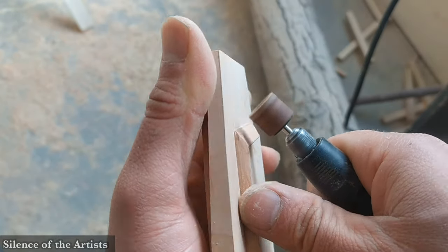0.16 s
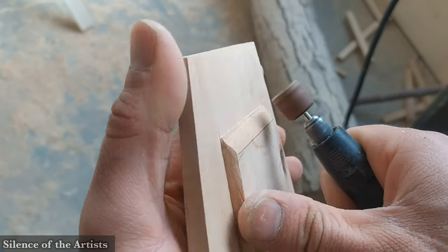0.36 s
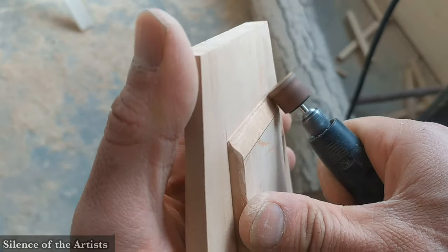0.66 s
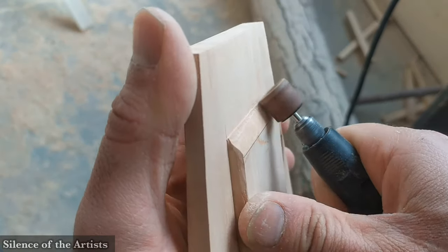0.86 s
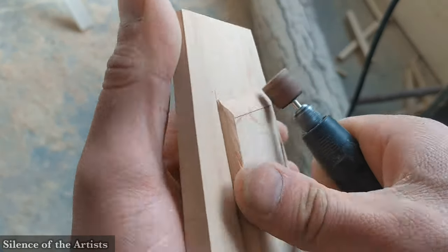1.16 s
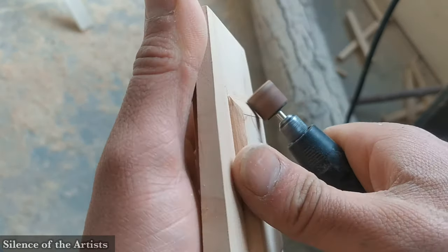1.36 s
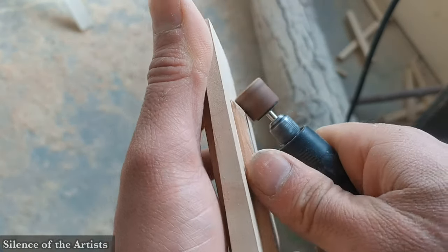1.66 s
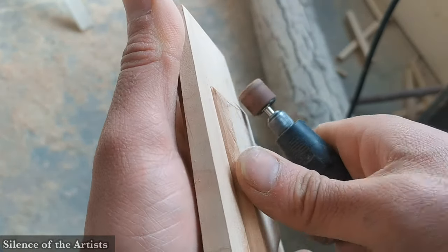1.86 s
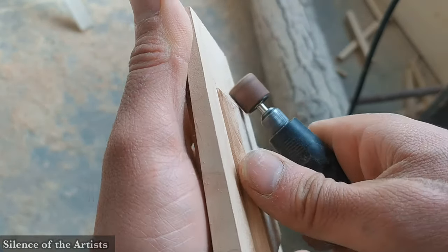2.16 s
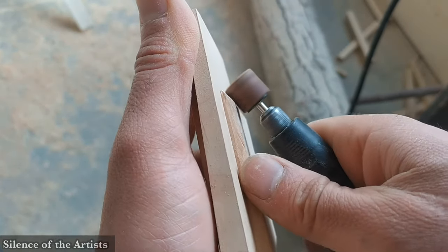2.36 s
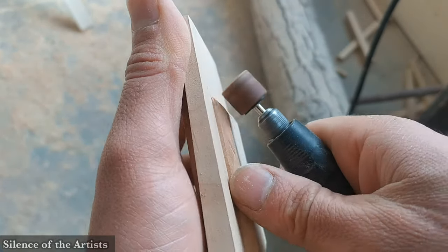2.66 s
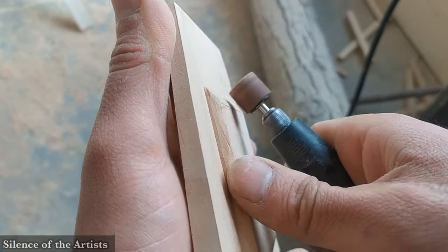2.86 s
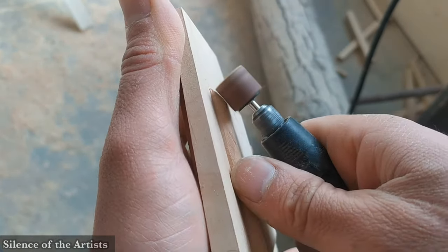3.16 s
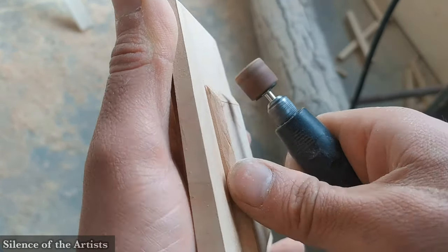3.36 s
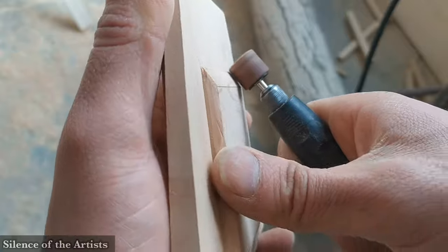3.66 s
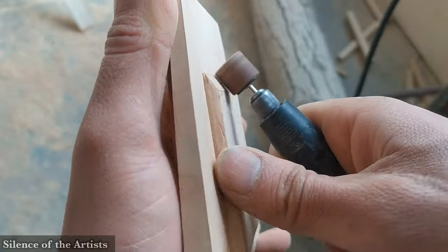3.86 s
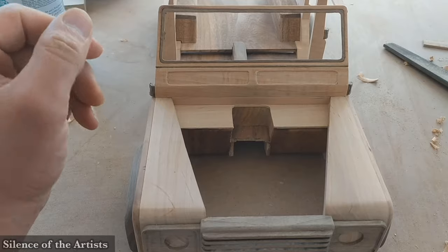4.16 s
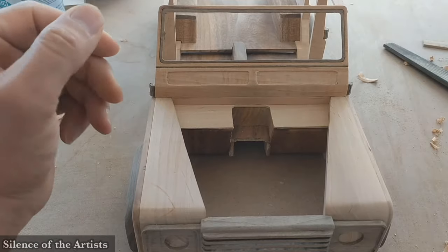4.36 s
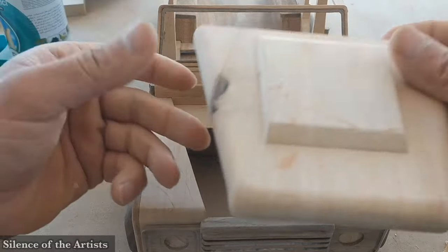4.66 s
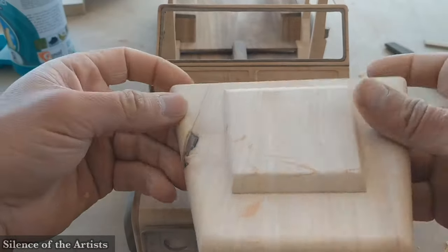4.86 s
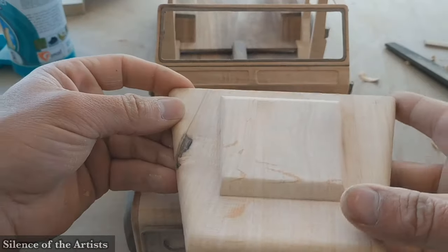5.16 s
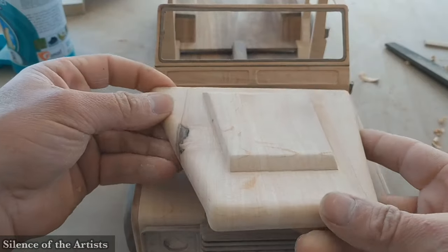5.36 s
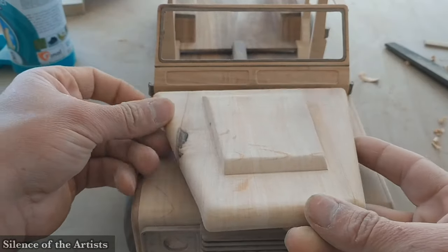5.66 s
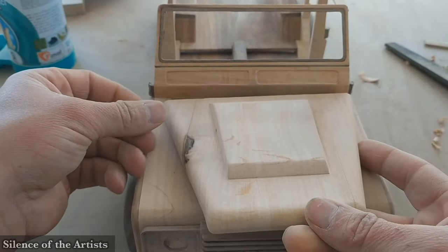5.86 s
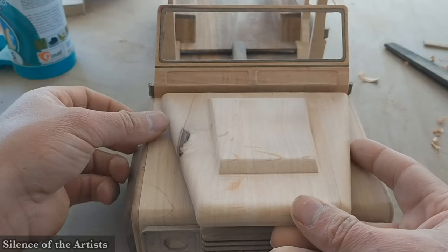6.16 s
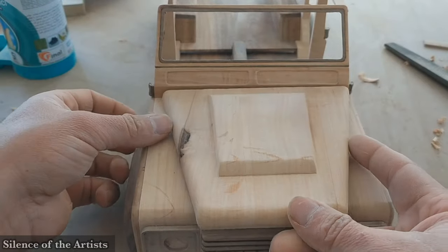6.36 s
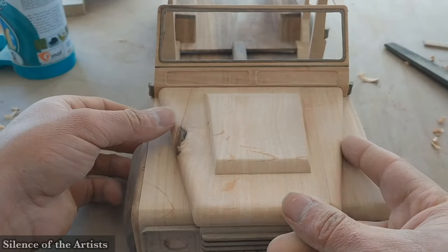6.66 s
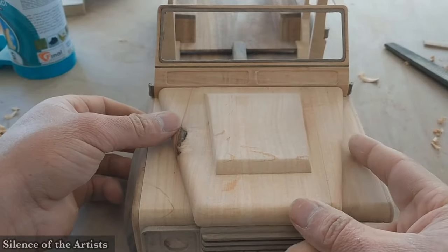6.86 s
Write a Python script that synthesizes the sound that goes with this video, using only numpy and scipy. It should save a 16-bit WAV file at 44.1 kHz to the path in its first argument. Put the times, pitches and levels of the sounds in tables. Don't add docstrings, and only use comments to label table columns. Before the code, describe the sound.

A small high-speed sander buzzes against wood for four seconds, stops dead, then hands rustle softly and set a wooden lid onto a hollow model.

```python
import sys
import numpy as np
from scipy import signal
from scipy.fft import rfft, irfft, next_fast_len
from scipy.io import wavfile
from scipy.ndimage import uniform_filter1d, map_coordinates

SR = 44100
rng = np.random.default_rng(int(sys.argv[2]) if len(sys.argv) > 2 else 0)


def field_ratio(decibels):
    return 10 ** (np.asarray(decibels, dtype=float) / 20)


def master_out(mix):
    frames = np.transpose(np.atleast_2d(mix))
    ceiling = np.clip(frames, -1, 1)
    pcm = np.round(ceiling * 32767).astype(np.int16)
    wavfile.write(sys.argv[1], SR, pcm)


N = 308700
CUT_S = 4.04
CHATTER_IDLE_DB = -49.5
LOADED_DB, CLEAR_DB = -43, -37

# f/Hz, likeness/1
AIR_ALIKE = [(60, -0.28), (150, 0.38), (380, 0.46), (950, -0.22), (2380, -0.21), (5980, -0.046),
             (15000, -0.15)]


def tool():
    # t/s, contact rate f/Hz, hiss level/dB, brush level/dB, grip level/dB
    motor = [(0.0, 1010, -33, -46, -8), (0.12, 1076, -28, -38, 0.5), (0.4, 1141, -33.5, -38, -4.5),
             (0.71, 1184, -30, -40.5, -4), (0.86, 1154, -25, -37, 10.5), (1.03, 1095, -31, -33, -15.5),
             (1.35, 1164, -29, -43.5, 4.5), (1.715, 1093, -29.5, -42, -7.5), (1.9, 1150, -29.5, -40.5, -6),
             (2.08, 1107, -28.5, -42.5, 0.5), (2.28, 1080, -26.5, -33, 2.5), (2.5, 1033, -29.5, -63, -2),
             (2.66, 1058, -30.5, -47.5, 0), (3.0, 1084, -30, -43.5, 0), (3.21, 1073, -30, -43.5, -0.5),
             (3.37, 1119, -29.5, -34, -2.5), (3.64, 1133, -29.5, -37, 2.5), (3.84, 1095, -29, -44, -1.5)]
    # f/Hz, likeness/1
    tool_alike = [(60, 0.07), (130, 0.24), (290, 0.58), (640, 0.93), (1410, 0.94), (3100, -0.3),
                  (6820, 0.59), (15000, 0.49)]
    # f/Hz, level/dB
    tool_pan = [(60, -13), (130, 8), (290, 7.5), (640, 0.5), (1410, -2.5), (3100, 1.5), (6820, 0),
                (15000, -3)]
    # order/1 (multiple of the contact rate), level/dB
    stray = [(.45, -73), (.5, -75), (.77, -66), (.967, -54), (1.05, -62), (2.55, -60), (4.55, -60),
             (7.11, -51), (7.67, -48), (8.7, -51)]
    inertia_s = 0.05
    shade_hz, shade_width_hz, shade_loaded, shade_free = 3800, 340, 0.35, 0.97

    hz, hiss_db, brush_db, grip_db = curves(motor)
    hz = uniform_filter1d(hz, size=round(inertia_s * SR), mode="nearest")
    bearing_db, labour_db, bite_db, chatter_db = handling()
    free = np.clip((bearing_db - LOADED_DB) / (CLEAR_DB - LOADED_DB), 0, 1)

    cycles = np.cumsum(hz * (1 + 0.000581 * wobble(30))) / SR
    flutter = 1 + 0.036 * np.cos(np.pi / 10 * cycles + 2 * wobble(2.4))
    scatter = field_ratio(0.7 * rng.standard_normal(int(cycles[-1]) + 2))
    size = scatter[np.round(cycles).astype(int)]
    slip = 1 + np.clip(-np.gradient(hz) * SR / 150, 0, 4)

    hum, second = housing(hz, cycles, grip_db, flutter)
    clean = brushes(cycles, brush_db, flutter * size, slip) + hum
    clean = clean + bearing(cycles, bearing_db, labour_db, size, slip)
    clean = clean + drum(cycles, bite_db, hiss_db) + chatter(cycles, chatter_db)
    clean = clean + orders(cycles, stray, unsteady_db=5, blur=0.024)
    reflected = np.roll(clean, 37)

    noisy = lambda: grit(cycles, hiss_db, free, size) + housing_noise(chatter_db)
    pair = spread(clean + noisy(), reflected + noisy(), tool_alike)
    pair = pair + np.outer([1.2, -0.3], second)
    pair = filtered(pair, lambda f: field_ratio(np.outer([0.5, -0.5], along(tool_pan, f))))

    shaded = filtered(pair, lambda f: 1 / (1 + ((f - shade_hz) / shade_width_hz) ** 4))
    shading = np.maximum(free, np.clip((labour_db + 54.5) / 12, 0, 1))
    pair = pair - (shade_loaded + (shade_free - shade_loaded) * shading) * shaded
    return pair * np.clip((CUT_S - np.arange(N) / SR) / 0.00033, 0, 1)


def handling():
    # start t/s, length t/s, level/dB
    free_runs = [
        (0.03, 0.32, -35),
        (0.33, 0.45, -28),
        (1.07, 0.34, -38),
        (1.74, 0.22, -38.5),
        (2.68, 0.28, -43),
        (3.21, 0.22, -40.5),
        (3.44, 0.23, -37.5),
    ]
    # start t/s, length t/s, level/dB
    labours = [
        (.88, 0.11, -45.5),
        (1.42, .2, -55),
        (2.12, 0.092, -53.5),
        (2.25, .22, -43),
        (3.03, 0.12, -54),
    ]
    # start t/s, length t/s, level/dB
    bites = [
        (0.05, 0.66, -32),
        (0.72, 0.035, -28.5),
        (0.8, 0.13, -28.5),
        (1.11, 0.017, -33.5),
        (1.4, 0.03, -32),
        (2.08, 0.027, -20.5),
        (2.14, .03, -26.5),
        (3.72, 0.22, -30.5),
    ]
    # start t/s, length t/s, level/dB
    skips = [
        (0.6, 0.077, -42),
        (1.0, 0.015, -49),
        (1.47, 0.13, -43),
        (2.0, 0.061, -41.5),
        (2.4, 0.073, -42),
        (3.07, 0.072, -36.5),
        (3.73, 0.264, -42.5),
    ]
    sing_db_per_s, choke_db_per_s = 150, 248.5
    dig_db_per_s, lift_db_per_s = 300.5, 151.5
    return (strokes(free_runs, sing_db_per_s, choke_db_per_s, LOADED_DB),
            strokes(labours, sing_db_per_s, choke_db_per_s, -74),
            strokes(bites, dig_db_per_s, lift_db_per_s, -45),
            strokes(skips, dig_db_per_s, lift_db_per_s, CHATTER_IDLE_DB))


def brushes(cycles, brush_db, strength, slip):
    brush = [-20, -15.5, -20.5, -16, -8, -5.5, -16, -5.5, -34.5, -30.5, -24]
    buzz = orders(cycles, enumerate(brush, 3), unsteady_db=3.5, blur=0.022 * slip)
    return field_ratio(brush_db + 2.5) * strength * buzz


def bearing(cycles, bearing_db, labour_db, size, slip):
    rolling = [-35.5, -45.5, -2, -10.5, -2.5, 0.5, -7.5, -21, -34, -16.5]
    sung = [4, 5, 7.04]
    singing = [-19, -29, -6.5]
    labour = [-2, -7, 0]
    under = zip(np.arange(4, 14) - 0.095, rolling)
    cage = 1 + 0.17 * np.cos(2 * np.pi * 0.095 * cycles + wobble(15))
    whine = orders(cycles, under, unsteady_db=-1.5, blur=0.082 * slip)
    song = orders(cycles, zip(sung, singing), unsteady_db=-1.5, blur=0.03 * slip)
    growl = orders(cycles, enumerate(labour, 3), unsteady_db=7.0, blur=0.03)
    return field_ratio(bearing_db - 3.0) * size * cage * whine + field_ratio(bearing_db) * song + field_ratio(labour_db) * growl


def housing(hz, cycles, grip_db, flutter):
    # f/Hz, level/dB
    housing_hum = [(1005, -67), (1035, -39), (1068, -34), (1091, -30.5), (1115, -37.5), (1140, -49.5),
                   (1172, -35), (1190, -33.5)]
    # f/Hz, level/dB
    housing_second = [(2010, -66.5), (2090, -51), (2140, -53.5), (2185, -52.5), (2240, -53), (2300, -43),
                      (2345, -47.5), (2375, -63)]
    # start t/s, length t/s, gain level/dB
    loosens = [
        (.77, 0.11, -2.5),
        (.935, 0.013, 9),
        (.995, 0.059, 11),
        (1.47, 0.0091, 13.5),
        (1.625, 0.08, 8.5),
        (2.2, 0.097, 2),
        (2.99, 0.12, 3.5),
    ]
    hum_db = along(housing_hum, hz) + grip_db + strokes(loosens, 400, 700, 0)
    second_db = along(housing_second, 2 * hz)
    beads = field_ratio(np.clip((-hum_db - 35) / 2, 0.5, 5) * wobble(80))
    hum = field_ratio(hum_db - 2) * beads * flutter * np.sin(2 * np.pi * cycles)
    second = field_ratio(second_db + 5.0 + 4.0 * wobble(30.6)) * np.sin(4 * np.pi * cycles)
    return hum, second


def drum(cycles, bite_db, hiss_db):
    # f/Hz, width f/Hz, level/dB
    bite = [(2500, 1800, -18.5), (4350, 2800, -12.5), (6550, 480, 0.5), (7550, 780, -0.5)]
    press = np.clip(bite_db - hiss_db - 3.5, -30, 0)
    turns = pulses(cycles / 2, jitter=0.026, scatter_db=3.0, pattern=[1])
    strikes = unit(filtered(turns, resonances(bite)))
    return field_ratio(bite_db - 5.0 + 0.86 * press) * strikes


def chatter(cycles, chatter_db):
    half_orders = [-6, -3.5, -5, -1, -5, -10, -4.5]
    halves = zip(np.arange(5, 12) / 2, half_orders)
    level_db = chatter_db + np.clip(chatter_db + 55, -12, 1) - 2.0
    return field_ratio(level_db) * orders(cycles, halves, unsteady_db=1.0, blur=0.39)


def grit(cycles, hiss_db, free, size):
    # f/Hz, level/dB
    hiss = [(1470, -41), (2500, -19), (3250, -16.5), (3620, -28), (3730, -7), (4190, -12), (4490, -11),
            (5930, -12.5), (8720, -1.5), (10400, 1), (12200, -4), (15100, -8), (15800, -13.5)]
    repeat_loaded, repeat_free = 0.19, 0.95
    share = np.clip(repeat_loaded + (repeat_free - repeat_loaded) * free, 0, 1)
    noise = np.sqrt(share) * repeating(cycles) + np.sqrt(1 - share) * unit(patches(depth_db=0.5))
    gate = size * (1 + 0.058 * np.cos(2 * np.pi * cycles))
    level_db = hiss_db + 1.5 * free - 1.28 + 0.9 * wobble(24.83)
    return field_ratio(level_db) * coloured(gate * noise, hiss)


def housing_noise(chatter_db):
    # f/Hz, level/dB
    body = [(180, -60), (300, -32.5), (522, -13.5), (630, -18), (797, -5), (997, -4), (1080, 1),
            (1290, -13), (1540, -4), (3120, -7.5), (3770, 0.5), (4290, -8.5), (5000, -16), (6500, -25.5),
            (11000, -120)]
    level_db = -50.5 + 4.5 + 0.19 * (chatter_db - CHATTER_IDLE_DB) + 2.1 * wobble(12)
    return field_ratio(level_db) * coloured(rng.standard_normal(N), body)


def knocks(groups):
    # f/Hz, width f/Hz, level/dB
    lid = [(210, 190, -5), (306, 120, 1), (440, 120, -3.5), (590, 260, -0.5), (872, 430, 0),
           (1284, 280, -2), (1630, 870, -7.5), (2405, 770, -6), (3780, 780, -14.5)]
    low_notes_last, hard_hits_damp = 0.74, 0.11
    near, rattle, cracks = np.zeros((3, N + SR))
    t = np.arange(SR // 6) / SR
    for rattle_db, ring_s, contacts in groups:
        for s, db, hz, crack_db in contacts:
            t60 = ring_s * (500 / hz) ** low_notes_last * field_ratio(-hard_hits_damp * (db + 33.0))
            here = slice(round(s * SR), round(s * SR) + len(t))
            shake = rng.standard_normal((3, len(t)))
            soft = np.clip(-crack_db / 12, 0.3, 5)
            dulled = unit(uniform_filter1d(shake[0], size=1 + int(soft ** 2 * 2.3))) / (1 + 0.5 * soft)
            fade = field_ratio(db - 60 * t / t60) * (1 - np.exp(-t / (0.00019 * soft)))
            note = np.sin(2 * np.pi * hz * t + 0.065 * np.cumsum(shake[2]))
            near[here] += field_ratio(3.5) * fade * note
            rattle_fade = field_ratio(db + rattle_db - 60 * t / (1.5 * t60))
            rattle[here] += rattle_fade * (1 - np.exp(-t / (0.00056 * soft))) * dulled
            cracks[here] += field_ratio(db + crack_db - 60 * t / 0.021) * shake[1]

    dull = lambda f: 1j * f / (2500 + 1j * f) * resonances([(4500, 6000, 0)])(f)
    wood = near[:N] + filtered(rattle[:N], resonances(lid)) + filtered(cracks[:N], dull)
    no_top = lambda f: 1 / (1 - (f / 9000) ** 2 + 1.2j * f / 9000) ** 3
    no_bass = lambda f: (1j * f / (120 + 1j * f)) ** 3
    return filtered(wood, lambda f: no_top(f) * no_bass(f))


def bench():
    # t/s, level/dB
    landings = [
        (5.739, -40),
        (5.912, -40),
        (6.32, -49.5),
        (6.645, -34.5),
    ]
    # f/Hz, t60 t/s
    bench_tones = [(118, 1.37), (205, 0.84), (300, 0.71)]
    thumps = np.zeros(N + SR)
    for s, db in landings:
        thumps[round(s * SR)] = field_ratio(db)
    t = np.arange(SR) / SR
    ring = sum(np.sin(2 * np.pi * hz * t) * field_ratio(-60 * t / t60) * (1 - np.exp(-t / 0.033))
               for hz, t60 in bench_tones)
    ringing = field_ratio(-7.5 + 2.6 * wobble(25)) * signal.fftconvolve(thumps, ring)[:N]
    shake_fade = field_ratio(-11.5 - 60 * t / 1.73) * (1 - np.exp(-t / 0.04))
    shaking = signal.fftconvolve(thumps, shake_fade)[:N]
    pressing = resonances([(178, 530, 0)])
    rumble = unit(filtered(rng.standard_normal(N), lambda f: pressing(f) ** 2))
    return ringing + shaking * rumble


def ticks(rows, waver, thin_hz):
    out = np.zeros((2, N + SR))
    t = np.arange(SR // 50) / SR
    for s, db, hz, pan_db in rows:
        shake = waver * np.cumsum(rng.standard_normal(len(t)))
        snap = np.sin(2 * np.pi * hz * t + shake) * field_ratio(-60 * t / 0.01) * (1 - np.exp(-t / 0.0002))
        sides_db = np.array([[0.5], [-0.5]]) * pan_db
        out[:, round(s * SR):][:, :len(t)] += field_ratio(db + 6.5 + sides_db) * snap
    return filtered(out[:, :N], lambda f: f ** 2 / (f ** 2 + thin_hz ** 2))


def hands():
    # start t/s, length t/s, skin level/dB, sleeve level/dB
    rustle = [(4.124, 0.11, -63.5, -63.5), (4.202, 0.044, -61.5, -66.5), (4.294, 0.012, -62.5, -73),
              (4.384, 0.039, -62.5, -57.5), (4.425, 0.052, -65, -66), (4.518, 0.1, -73, -72),
              (4.819, 0.049, -68.5, -67), (4.957, 0.007, -65.5, -67), (5.015, .16, -73.5, -74.5),
              (5.186, .1, -63, -72), (5.302, 0.11, -69.5, -66), (5.47, 0.047, -70.5, -71.5),
              (5.635, 0.071, -68, -65.5), (5.764, 0.036, -66, -69), (5.844, 0.075, -83, -66),
              (6.066, 0.13, -67.5, -60.5), (6.263, 0.086, -70.5, -62.5), (6.53, 0.012, -67, -62),
              (6.646, 0.047, -56, -47.5), (6.71, 0.096, -75, -57.5), (6.85, 0.16, -78, -68.5)]
    # f/Hz, level/dB
    skin = [(2940, -21.5), (5000, -11), (6800, -7.5), (7170, -6.5), (8530, 3.5), (10900, -7.5),
            (11700, -15), (15800, -23.5)]
    # f/Hz, level/dB
    sleeve = [(590, -37), (1000, -10), (1400, -14), (1450, -5), (1680, -1), (2010, -9), (3230, -2),
              (7000, -9.5), (9100, -17), (15400, -120)]
    rows = np.array(rustle)
    touch_db_per_s, leave_db_per_s, still_db = 450, 409, -98
    skin_db = strokes(rows[:, [0, 1, 2]], touch_db_per_s, leave_db_per_s, still_db)
    sleeve_db = strokes(rows[:, [0, 1, 3]], touch_db_per_s, leave_db_per_s, still_db)
    grain = lambda: field_ratio(1.3 * wobble(270) + 1.5 * wobble(30)) * patches(depth_db=3.5)
    one = lambda: field_ratio(skin_db + 5.5) * coloured(grain(), skin) + field_ratio(sleeve_db) * coloured(grain(), sleeve)
    return spread(one(), one(), AIR_ALIKE) * field_ratio([[-1.5], [1.5]]) * (np.arange(N) > CUT_S * SR)


def room(x):
    # f/Hz, t60 t/s
    echo_times = [(150, 0.78), (700, 0.73), (3000, 0.42), (10000, 0.52)]
    hz, t, z = signal.stft(rng.standard_normal((2, 3 * SR // 4)), SR, nperseg=256)
    tail = signal.istft(z * field_ratio(-60 * t / along(echo_times, hz)[:, None]), SR, nperseg=256)[1]
    late = np.pad(x, (400, 0))[None]
    return signal.fftconvolve(late, tail / np.linalg.norm(tail[0]), axes=1)[:, :N]


def air():
    # f/Hz, level/dB
    air_colour = [(12, -32.5), (20, 9), (93, -11.5), (153, -9.5), (317, -17.5), (1250, -27.5),
                  (2570, -33.5), (3310, -24), (4630, -30.5), (6840, -37.5), (8550, -23.5), (13000, -45),
                  (15800, -54)]
    one = lambda: coloured(rng.standard_normal(N), air_colour)
    return field_ratio(-67.5 + 5.5) * spread(one(), one(), AIR_ALIKE) * field_ratio([[-2], [1.5]])


def orders(cycles, table, unsteady_db, blur):
    n = round(CUT_S * SR)
    cycles, blur = cycles[:n], (blur * np.ones(N))[:n]
    total = np.zeros(n)
    for k, db in table:
        phase = 0.63 * rng.standard_normal() + blur * k * wobble(90, size=n)
        swell = field_ratio(db - 1.5 + unsteady_db * wobble(21.75, size=n))
        total += swell * np.cos(2 * np.pi * k * cycles + phase)
    return np.pad(total, (0, N - n))


def pulses(cycles, jitter, scatter_db, pattern):
    k = np.arange(1, int(cycles[-1]) - 1)
    at = np.interp(k + jitter * rng.standard_normal(len(k)), cycles, np.arange(N))
    size = field_ratio(scatter_db * rng.standard_normal(len(k))) * np.asarray(pattern)[k % len(pattern)]
    taps = np.floor(at)[:, None] + np.arange(-7, 9)
    off = taps - at[:, None]
    shape = np.sinc(off) * np.cos(np.pi * off / 16) ** 2
    places = np.clip(taps, 0, N - 1).astype(int)
    return np.bincount(places.ravel(), (size[:, None] * shape).ravel(), N)


def repeating(cycles):
    steps = 64
    m = next_fast_len(int(cycles[-1] * steps) + steps)
    order = np.fft.rfftfreq(m, 1 / steps)
    comb = (order < 17) / (1 - 0.6 * np.exp(-2j * np.pi * (order + 0.068)))
    noise = irfft(rfft(rng.standard_normal(m)) * comb, m)
    return unit(map_coordinates(noise, [cycles * steps]))


def patches(depth_db):
    z = signal.stft(rng.standard_normal(N), nperseg=256)[2]
    field = uniform_filter1d(rng.standard_normal(z.shape), size=4, axis=0)
    field = uniform_filter1d(field, size=8, axis=1)
    return signal.istft(z * field_ratio(depth_db * unit(field)), nperseg=256)[1][:N]


def strokes(rows, rise, fall, rest):
    t = np.arange(0, N + 64, 64) / SR
    level = np.full(len(t), float(rest))
    for s, length, db in rows:
        drop_db = np.maximum(0, np.maximum((s - t) * rise, (t - s - length) * fall))
        level = np.maximum(level, db - drop_db)
    return np.interp(np.arange(N) / SR, t, level)


def curves(rows):
    s, *cols = np.transpose(rows)
    return [np.interp(np.arange(N) / SR, s, c) for c in cols]


def wobble(rate, size=N):
    coarse = np.arange(0, size + 32, 32)
    knots = rng.standard_normal(int(size * rate / SR) + 5)
    return np.interp(np.arange(size), coarse, map_coordinates(knots, [coarse * rate / SR]))


def unit(x):
    return x / np.sqrt(np.mean(x ** 2) + 1e-20)


def along(points, hz):
    f, v = np.transpose(points)
    return np.interp(np.log(hz + 1), np.log(f + 1), v)


def filtered(x, response):
    m = next_fast_len(N + SR // 2)
    return irfft(rfft(x, m) * response(np.fft.rfftfreq(m, 1 / SR)), m)[..., :N]


def coloured(x, spectrum):
    return unit(filtered(x, lambda hz: field_ratio(along(spectrum, hz))))


def resonances(modes):
    return lambda f: sum((-1) ** k * field_ratio(db) * 1j * f * w / (c * c - f * f + 1j * f * w)
                         for k, (c, w, db) in enumerate(modes))


def spread(mid, side, alike):
    turn = lambda hz: np.arccos(np.clip(along(alike, hz), -1, 1)) / 2
    a, b = filtered(np.array([mid, side]), lambda hz: [np.cos(turn(hz)), np.sin(turn(hz))])
    return np.array([a + b, a - b])


def scene():
    # t/s, peak level/dB, note f/Hz, crack level/dB
    lid_knocks = [(5.054, -64.5, 500, -15), (5.429, -50, 512, -34), (5.7348, -23.5, 1680, -4.5),
                  (5.737, -21, 530, -16.5), (5.7405, -32, 497, -23), (5.746, -21.5, 704, -21),
                  (5.755, -23.5, 352, -32), (5.818, -33, 520, -53), (5.9085, -28, 910, -44),
                  (5.911, -33, 295, -48), (5.9129, -23.5, 870, -58), (5.921, -33, 934, -57),
                  (6.065, -41, 200, -61), (6.066, -49, 2020, -38), (6.099, -46, 257, -57),
                  (6.15, -46.5, 367, -40), (6.3195, -35.5, 307, -39), (6.329, -53, 270, -25),
                  (6.582, -48, 297, -56), (6.597, -43.5, 327, -40), (6.614, -39, 350, -43),
                  (6.629, -28.5, 282, -47), (6.637, -26.5, 299, -42), (6.644, -14.5, 936, -34),
                  (6.645, -18, 914, -18.5), (6.6487, -16.5, 1586, -12.5), (6.6515, -12, 840, -31.5),
                  (6.656, -23.5, 1500, 0.5), (6.6594, -22, 940, -20), (6.665, -33, 855, -32)]
    # t/s, peak level/dB, note f/Hz, crack level/dB
    taps = [
        (0.7569, -27.5, 1400, -31.5),
        (0.7628, -32.5, 1484, -37),
    ]
    # t/s, peak level/dB, note f/Hz, crack level/dB
    bumps = [(1.758, -36, 835, -13), (1.794, -34, 920, -27.5), (1.801, -34, 650, -21.5),
             (1.807, -38.5, 750, -20), (1.812, -33, 760, -13), (1.817, -34.5, 1500, -7.5),
             (1.822, -33.5, 760, -7.5), (1.825, -35, 1780, -11), (1.830, -34.5, 530, -13),
             (1.836, -37, 526, -24.5), (1.842, -43, 520, -29), (1.885, -42, 690, -31)]
    # t/s, peak level/dB, f/Hz, left over right level/dB
    nails = [
        (4.775, -58, 1650, 4),
        (4.7942, -53.5, 6420, -3),
        (4.7948, -47.5, 1400, 8),
        (5.217, -47, 12520, -11),
        (5.2545, -43.5, 9430, -12),
        (5.2553, -38.5, 4340, -16),
        (6.6487, -34.5, 4780, -3),
        (6.6565, -36, 8750, 1),
        (6.658, -39.5, 7000, -3),
    ]
    # t/s, peak level/dB, f/Hz, left over right level/dB
    pads = [
        (5.391, -55, 700, 0.0059),
        (5.392, -59, 1400, 0),
        (5.411, -62, 700, 0),
        (5.429, -50, 520, 0),
        (5.43, -58, 990, 0),
        (5.554, -65, 1010, 0),
    ]
    wood = knocks([(10.5, 0.036, lid_knocks), (-9.5, 0.068, taps), (0, 0.028, bumps)])
    turn = 2.5 * wobble(10)
    echoes = np.cos(turn) * room(wood) + np.sin(turn) * room(wood)
    echoes = field_ratio(-7.5) * (echoes + 0.051 * echoes[::-1])
    fingers = ticks(nails, waver=0.19, thin_hz=1500) + ticks(pads, waver=0.04, thin_hz=200)
    return tool() + wood + bench() + echoes + fingers + hands() + air()


def top_cut(x):
    return signal.sosfilt(signal.butter(12, 15830, fs=SR, output="sos"), x)


def record(dry):
    mix = filtered(dry, lambda hz: hz < 15800)
    return top_cut(mix)


dry = scene()
out = record(dry)
master_out(out)
```